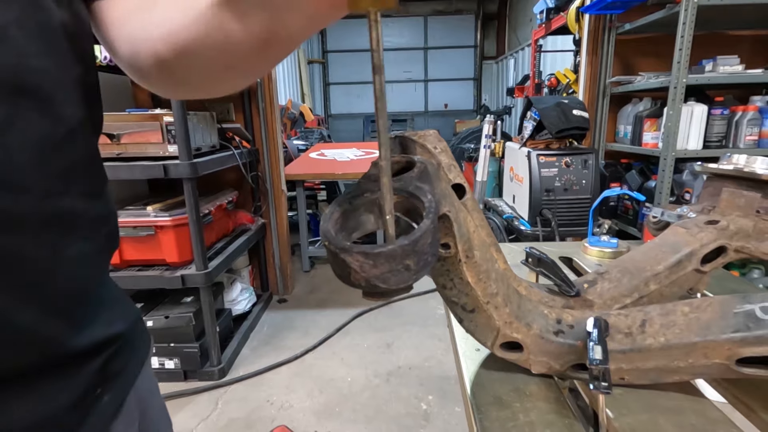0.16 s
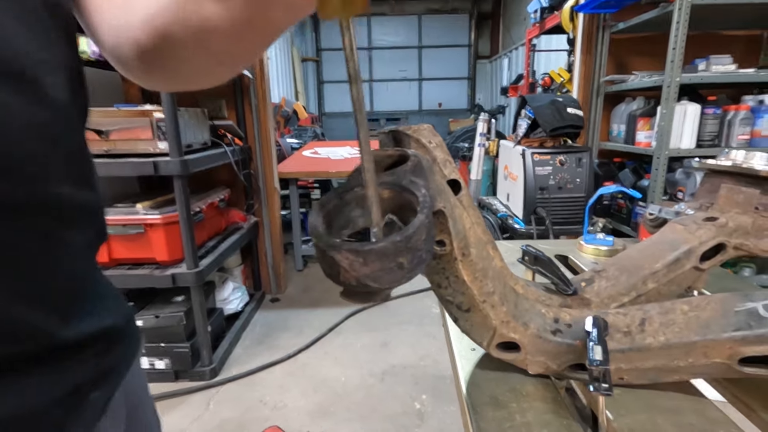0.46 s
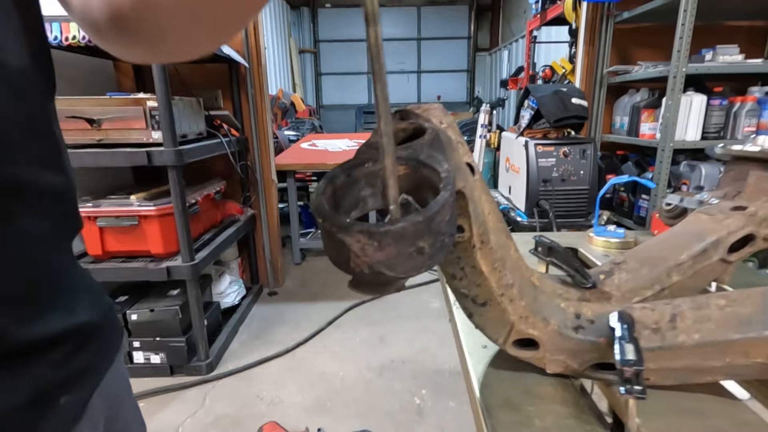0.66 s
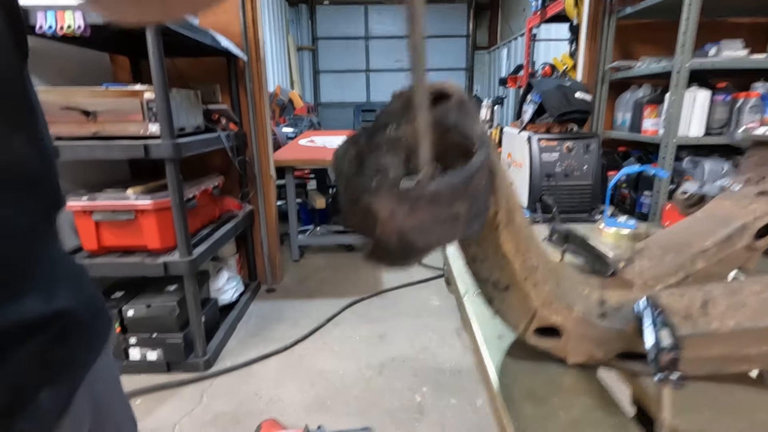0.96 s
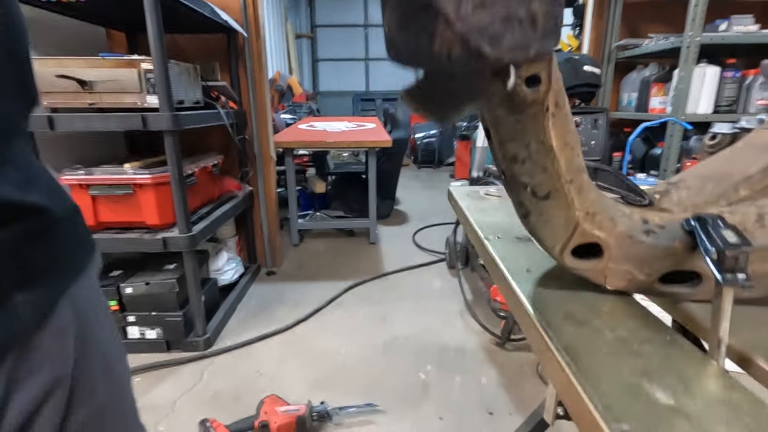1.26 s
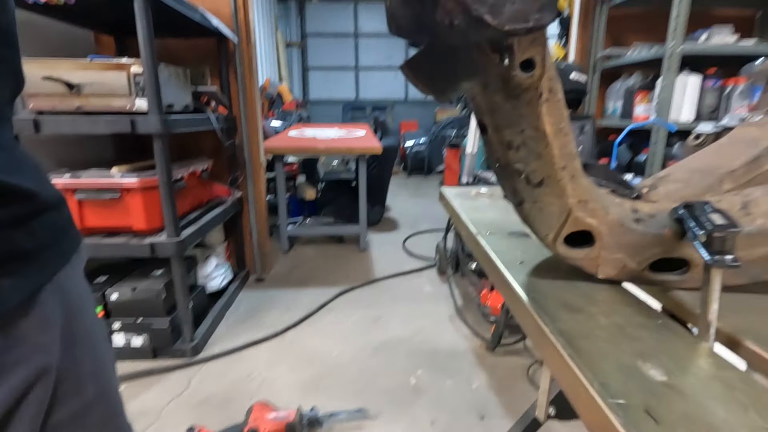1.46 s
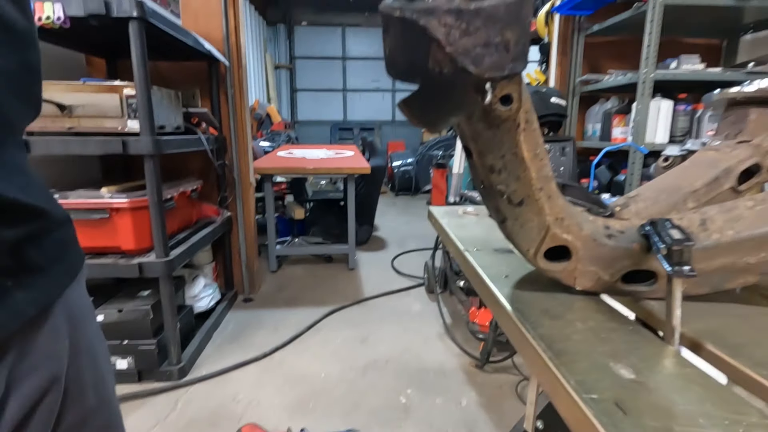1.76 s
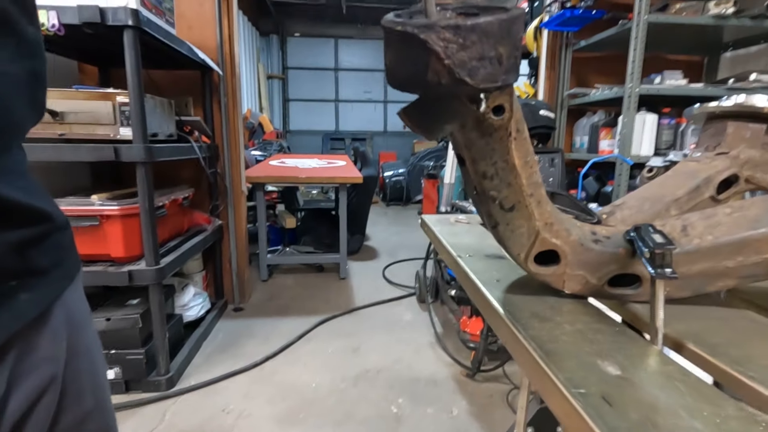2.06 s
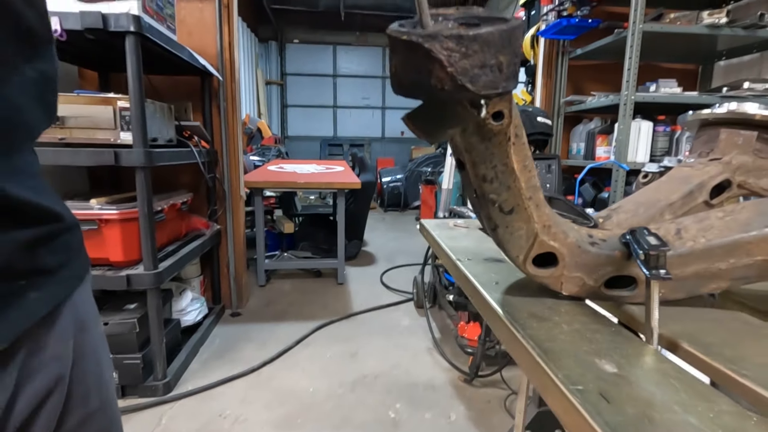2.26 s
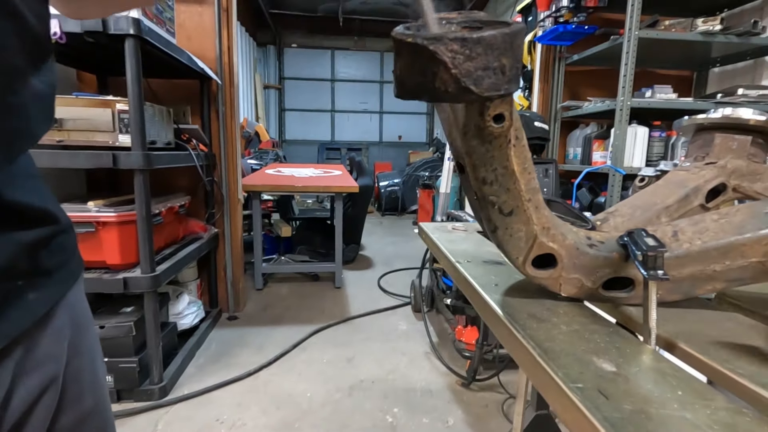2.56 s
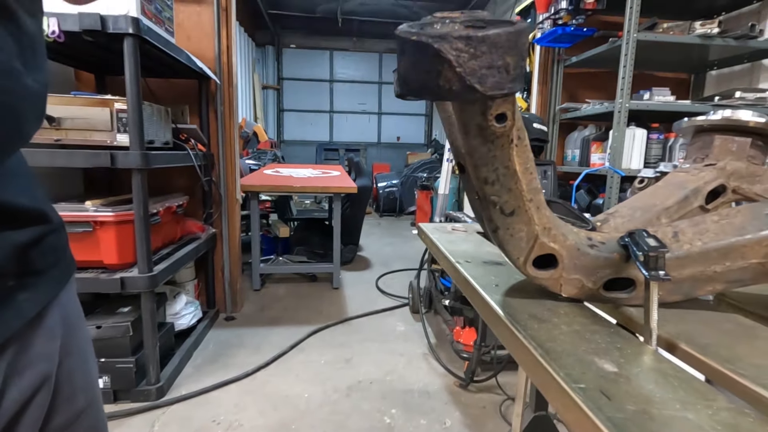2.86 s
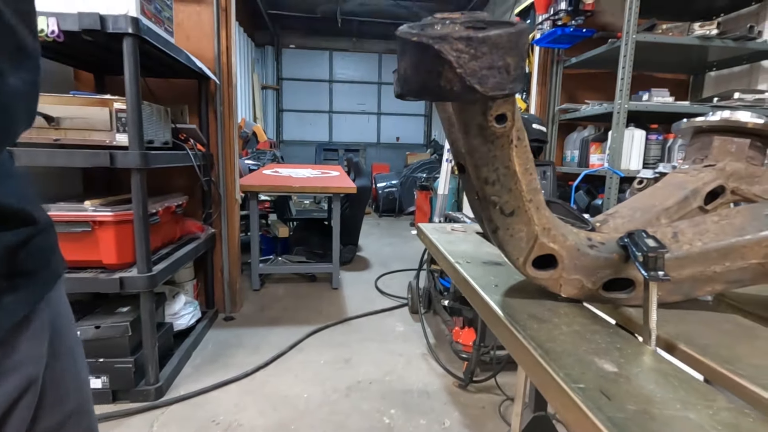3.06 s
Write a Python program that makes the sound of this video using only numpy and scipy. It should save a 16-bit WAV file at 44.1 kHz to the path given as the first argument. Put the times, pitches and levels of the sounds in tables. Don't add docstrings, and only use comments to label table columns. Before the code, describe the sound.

Close up in a reverberant garage, four sharp steel hammer blows, a brief chisel touch and slide, a pause, then a fifth blow frees a metal bushing that bounces, rocks and scrapes on the bench top.

```python
import sys
import numpy as np
from scipy import signal
from scipy.fft import rfft, irfft, next_fast_len
from scipy.io import wavfile
from scipy.ndimage import map_coordinates

SR = 44100
rng = np.random.default_rng(int(sys.argv[2]) if len(sys.argv) > 2 else 0)


def invert_db(x):
    u = np.asarray(x, float) / 20
    return 10 ** u


def transcribe(u):
    v = np.clip(np.atleast_2d(u).T, -1, 1)
    q = np.round(v * 32767).astype(np.int16)
    wavfile.write(sys.argv[1], SR, q)


N = 141120

# pitch_hz [Hz], level_db [dB]
CRACK_COLOUR = [(150, -30.5), (800, -0.5), (2500, 1.5), (8000, -6.5), (16000, -19.5)]
# pitch_hz [Hz], level_db [dB]
WASH_COLOUR = [(60, -17), (300, -11.5), (1000, 6), (2500, 7.5), (6000, 0.5), (16000, -22.5)]
# pitch_hz [Hz], t60_s [s]
WASH_DECAY = [(100, 0.11), (700, 0.26), (2000, 0.2), (5000, 0.15), (13000, 0.097)]
# pitch_hz [Hz], level_db [dB], t60_s [s]
SHANK_MODES = [(9100, 0, .1), (12400, -2, .08), (14830, -11, .07)]


def unit(x):
    return x / np.sqrt(np.mean(x ** 2) + 1e-20)


def along(points, hz):
    point_hz, value = np.transpose(points)
    return np.interp(np.log(hz + 1), np.log(point_hz + 1), value)


def curve(rows):
    s, value = np.transpose(rows)
    return np.interp(np.arange(N) / SR, s, value)


def wobble(rate_hz):
    values = rng.standard_normal(int(N * rate_hz / SR) + 4)
    return map_coordinates(values, [np.arange(N) * rate_hz / SR])


def coloured(x, colour):
    size = next_fast_len(len(x) + 8192)
    gain = invert_db(along(colour, np.fft.rfftfreq(size, 1 / SR)))
    return irfft(rfft(x, size) * gain, size)[:len(x)]


def dying(colour, decay, bright_db=0):
    hz, t, z = signal.stft(rng.standard_normal(SR // 2), SR, nperseg=128)
    tilt_db = bright_db * np.log2((hz + 50) / 2000) / 2
    gain = unit(invert_db(along(colour, hz) + tilt_db))
    fall = invert_db(-60 * t / along(decay, hz)[:, None])
    return signal.istft(z * gain[:, None] * fall, SR, nperseg=128)[1][:SR // 2]


def burst(colour, t60_s, bright_db=0):
    fall = invert_db(-60 * np.arange(SR // 2) / SR / t60_s)
    return dying(colour, [(1, 9)], bright_db) * fall


def ring(modes, scatter_db=2):
    split_hz, blur_rad = 5, .35
    hz, db, t60_s = np.transpose(modes)[:, :, None]
    t = np.arange(SR // 2) / SR
    balance, detune, split = rng.standard_normal((3, len(modes), 1))
    beat = np.cos(2 * np.pi * split_hz * split * t)
    steps = rng.standard_normal((len(modes), 175)).repeat(126, 1)
    wander = np.cumsum(steps, 1) * blur_rad / 126
    fall = invert_db(db + scatter_db * balance - 60 * t / t60_s)
    tone = np.sin(2 * np.pi * hz * (1 + .001 * detune) * t + wander)
    return (fall * beat * tone).sum(0)


def softly(rise_s):
    return 1 - np.exp(-np.arange(SR // 2) / SR / rise_s)


def add(track, s, sound):
    part = track[round(s * SR):][:len(sound)]
    part += sound[:len(part)]


def hammer():
    blow_s = [.4766, .8187, 1.1541, 1.428, 2.3549]
    # chisel_ring_db [dB], socket_knock_db [dB], bench_thud_db [dB], crack_db [dB], frame_wash_db [dB]
    blows = [
        (-0.5, -15, -23.5, -8, -26.5),
        (-8.5, -11, -11.5, -12, -28.5),
        (-6.5, -16, -10, -12, -28.5),
        (-14.5, -21.5, -27, -9.5, -27),
        (-8.5, -26, -41.5, -9.5, -33.5),
    ]
    # pitch_hz [Hz], level_db [dB]
    clack_modes = [
        [(830, -10.5), (1710, -3), (2540, 2), (3400, -13.5), (4630, -15), (5930, -16.5), (7000, -12.5),
         (10900, -25)],
        [(926, -4.5), (1770, -1.5), (2160, 3), (2700, -1), (4380, -12.5), (6490, -9.5), (7570, -13.5)],
        [(1370, -16.5), (2230, 2), (2930, -11.5), (4100, -13.5), (4840, -10), (7490, -14.5), (9140, -13.5)],
        [(1670, -7), (3360, -9), (4710, 0.5), (5890, -3.5), (6820, 0), (9500, -5), (11400, -3.5)],
        [(1500, -21), (2500, 2.5), (3750, 1.5), (4790, -11), (6360, -12), (8100, -8.5), (10700, -21)],
    ]
    grip = [0.016, 0.013, 0.014, 0.0077, 0.012]
    bite = [-7, 0.5, 3, -0.5, 8]
    # pitch_hz [Hz], level_db [dB], t60_s [s]
    socket = [(566, 4, 0.01), (882, 2, 0.013), (1443, 1, 0.014)]
    # pitch_hz [Hz], level_db [dB], t60_s [s]
    bench = [(55.4, -21, 0.2), (151, -4, 0.016), (304, -10.5, 0.013)]
    # pitch_hz [Hz], level_db [dB], t60_s [s]
    frame_modes = [(915, -6, .2), (1017, -6, .25), (1385, -6, .28), (1615, -6, .18), (1735, -6, .24),
                   (1870, -6, .18), (2000, -7, .2), (2850, -5, .24), (3370, -9, .13), (3500, -8, .17),
                   (4118, -12, .16), (4590, -3, .1), (5260, -12, .15), (5980, -15, .17)]
    x, clacks = np.zeros((2, N))
    for s, clack, t60_s, bright_db, levels in zip(blow_s, clack_modes, grip, bite, blows):
        ring_db, knock_db, thud_db, crack_db, wash_db = levels
        add(clacks, s, invert_db(ring_db) * ring([(hz, db, t60_s) for hz, db in clack]))
        knock = invert_db(knock_db) * ring(socket)
        thud = invert_db(thud_db) * ring(bench)
        crack = invert_db(crack_db) * burst(CRACK_COLOUR, .013, bright_db)
        shaken = dying(WASH_COLOUR, WASH_DECAY) + invert_db(-8.5) * ring(frame_modes, scatter_db=3.5)
        add(x, s, knock + thud + crack + invert_db(wash_db) * shaken)
    return x, clacks


def chisel():
    # start_s [s], click_db [dB], ring_db [dB], wash_db [dB]
    touches = [
        (1.486, -30, -27.5, -45),
        (1.5, -43, -37, -53),
        (1.508, -30.5, -38.5, -44.5),
        (1.9087, -41.5, -32.5, -47),
    ]
    # pitch_hz [Hz], level_db [dB], t60_s [s]
    touch_modes = [(440, -7, .04), (2370, 0, .045), (3950, -4, .025), (4700, -10, .04), (5950, -9, .025)]
    # start_s [s], click_db [dB], ring_db [dB]
    rebounds = [(2.3549, -39, -23), (2.3632, -12.5, -28), (2.369, -24, -30), (2.374, -19, -37),
                (2.3785, -34, -35.5), (2.3845, -28.5, -46)]
    # pitch_hz [Hz], level_db [dB], t60_s [s]
    loose = [(1238, -8, .095), (1637, -3, .18), (2083, -2, .17), (3386, -10, .12), (4167, -7, .14),
             (4506, -8, .12), (4743, -12, .18), (5329, -11, .13), (8780, -9, .06), (9065, -11, .06)]
    # pitch_hz [Hz], level_db [dB]
    tap = [(600, -23), (1900, 16), (4000, -8.5), (9000, -3.5), (16000, -20)]
    # start_s [s], peak_db [dB]
    rests = [(2.964, -52.5), (2.9872, -45.5), (3.011, -48.5), (3.0776, -51.5), (3.1093, -51)]
    # time_s [s], level_db [dB]
    song_db = [(1.51, -49), (1.555, -49), (1.575, -38.5), (1.592, -56), (1.61, -90)]
    # pitch_hz [Hz], level_db [dB]
    overtones = [(6000, -17), (9400, -20)]
    x, t = np.zeros(N), np.arange(N) / SR
    for s, db, ring_db, wash_db in touches:
        steel = invert_db(ring_db) * ring(touch_modes)
        click = invert_db(db) * burst(CRACK_COLOUR, .018)
        add(x, s, steel + click + invert_db(wash_db) * dying(WASH_COLOUR, WASH_DECAY))
    for s, db, ring_db in rebounds:
        add(x, s, invert_db(ring_db) * ring(loose) + invert_db(db) * burst(tap, .011))
    for s, db in rests:
        chime = invert_db(-4) * ring(SHANK_MODES, scatter_db=4) + invert_db(2) * burst(CRACK_COLOUR, .12)
        add(x, s, invert_db(db - 9) * softly(.003) * chime)
    song = np.sin(2 * np.pi * 2372 * t)
    for hz, db in overtones:
        level = invert_db(db + 6.5 * wobble(90) - (curve(song_db) + 48) / 2)
        song += level * np.sin(2 * np.pi * hz * t + 1.5 * wobble(510))
    sliding = (t > song_db[0][0]) & (t < song_db[-1][0])
    return x + sliding * invert_db(curve(song_db)) * song


def bushing():
    # start_s [s], peak_db [dB], ring_db [dB], wash_db [dB], bright_db [dB]
    falls = [
        (2.45, -7, -25, -15, 7),
        (2.465, -4.5, -5, -2, 2),
        (2.613, -5, -11, -5, 5),
        (2.7802, -15.5, -7.5, -1, 5),
    ]
    # start_s [s], peak_db [dB], ring_db [dB], wash_db [dB], bright_db [dB]
    rocks = [(2.48, -20, -9, -3, -4.5), (2.4995, -10, -4.5, -6.5, 2), (2.534, -10, -19, -7, 7),
             (2.546, -24, 4, -2, -5), (2.574, -9, -12.5, -11, -0.5), (2.58, -12.5, -18, -9, -3),
             (2.664, -22.5, 1.5, 0, -6), (2.805, -17.5, -3, -3.5, -6.5), (2.839, -27.5, 2, -1, -1.5)]
    # pitch_hz [Hz], level_db [dB], t60_s [s]
    bushing_modes = [(1567, -4, .25), (1645, -2, .25), (1870, -4, .2), (2070, -4, .18), (3033, -2, .14),
                     (3092, -5, .18), (3478, -5, .2), (3800, -5, .18), (4176, 0, .25), (4765, -5, .22),
                     (5761, -7, .17), (6230, -9, .1), (7120, -12, .12), (1304, -6, .2)]
    # pitch_hz [Hz], level_db [dB]
    clatter = [(150, -43), (500, -1.5), (1600, -2.5), (4500, -4), (7800, -6.5), (9000, -14.5), (16000, -29)]
    # pitch_hz [Hz], t60_s [s]
    clatter_decay = [(300, 0.37), (1500, 0.42), (5000, 0.28), (8000, 0.18), (13000, 0.21)]
    # pitch_hz [Hz], level_db [dB], t60_s [s]
    chisel_strike = [(2550, -24.5, .03), (4560, 3.5, 0.04), (5920, -1, .05), (5760, -16, .03), (6350, -6, .03),
                     (8140, -14, .015), (10900, -16, .03)]
    # pitch_hz [Hz], level_db [dB], t60_s [s]
    hop = [(4180, -27, .17), (4172, -44, .55)]
    x = np.zeros(N)
    for rows, rise_s in ((falls, .0006), (rocks, .0015)):
        for s, db, ring_db, wash_db, bright_db in rows:
            snap = burst(CRACK_COLOUR, .022, bright_db) * softly(rise_s / 3)
            metal = invert_db(ring_db) * (ring(bushing_modes) + invert_db(-13) * ring(SHANK_MODES))
            shaken = invert_db(wash_db) * dying(clatter, clatter_decay, bright_db)
            add(x, s, invert_db(db - 13) * (snap + softly(rise_s) * (metal + shaken)))
    add(x, falls[0][0], invert_db(-24) * ring(chisel_strike))
    add(x, 2.795, softly(.012) * ring(hop, scatter_db=0))
    return x


def squeak():
    # time_s [s], pitch_hz [Hz], level_db [dB]
    scrape = [
        (2.822, 8900, -70),
        (2.836, 9300, -45),
        (2.855, 10100, -49),
        (2.885, 10900, -65),
    ]
    s, hz, db = np.transpose(scrape)
    t = np.arange(N) / SR
    scraping = (t > s[0]) * (t < s[-1])
    phase = 2 * np.pi * np.cumsum(np.interp(t, s, hz)) / SR
    return scraping * invert_db(np.interp(t, s, db)) * np.sin(phase + 1.5 * wobble(900))


def frame():
    # start_s [s], peak_db [dB], bright_db [dB]
    knocks = [(0.396, -43, 1), (0.522, -30.5, 18), (0.642, -32, -16.5), (0.66, -38, 6), (0.715, -50, 7),
              (0.751, -36.5, -4), (0.906, -34, 6.5), (1.021, -37.5, -6), (1.278, -39, 0), (1.597, -42, -3),
              (1.727, -40.5, -5.5), (1.865, -42.5, 0), (2.005, -38, -2), (2.11, -42, -6),
              (2.254, -41, -7.5)]
    # pitch_hz [Hz], level_db [dB]
    knock_colour = [(120, -45), (300, -20), (900, -3.5), (1600, 6), (2500, 0.5), (4500, -10.5),
                    (16000, -37)]
    # start_s [s], level_db [dB]
    drones = [(1.926, -52), (3.02, -46.5)]
    # pitch_hz [Hz], level_db [dB]
    plate = [(500, -16.5), (860, 1.5), (1300, -10.5), (2000, -11.5), (5000, -35)]
    # pitch_hz [Hz], level_db [dB], t60_s [s]
    board = [(850, -7.5, .3), (860, -1.5, 0.4), (960, -1, 0.26)]
    # start_s [s], level_db [dB]
    tinks = [(.904, -54), (1.277, -50)]
    # pitch_hz [Hz], level_db [dB], t60_s [s]
    screw = [(2800, 0, .07), (4100, 0, .05)]
    x, rise_s = np.zeros(N), .00074
    for s, db, bright_db in knocks:
        add(x, s, invert_db(db - 13.5) * softly(rise_s) * burst(knock_colour, .22, bright_db))
    for s, db in drones:
        add(x, s, invert_db(db) * softly(.026) * (burst(plate, .41) + invert_db(1.5) * ring(board)))
    for s, db in tinks:
        add(x, s, invert_db(db) * softly(rise_s) * ring(screw))
    return x


def walls(x):
    # pitch_hz [Hz], t60_s [s]
    room = [(200, 0.8), (2000, 0.7), (8000, 0.6), (15000, 0.14)]
    tail = dying([(100, 2.5), (16000, 3)], room)
    late = np.pad(x, (round(.012 * SR), 0))
    return signal.fftconvolve(late, tail / np.linalg.norm(tail))[:N]


def garage():
    # pitch_hz [Hz], level_db [dB]
    air_colour = [(25, 5), (100, -7.5), (300, -8), (1000, -10.5), (2000, -14), (5000, -28.5), (16000, -40)]
    # pitch_hz [Hz], level_db [dB]
    hum_tones = [(75.4, -79), (118.4, -81.5), (242.2, -83.5), (522.2, -82.5)]
    # time_s [s], level_db [dB]
    sway_db = [(0, -49.5), (.36, -55.5), (.45, -38.5), (.9, -41.5), (1.25, -34.5), (1.7, -42), (2, -35.5),
               (2.3, -39.5), (2.7, -43), (3, -41.5), (3.2, -50)]
    # pitch_hz [Hz], level_db [dB]
    rumble = [(2, -38), (8, 18), (30, -7.5), (45, -24.5), (90, -28.5)]
    t = np.arange(N) / SR
    air = invert_db(-64 + .51 * wobble(2.7)) * unit(coloured(rng.standard_normal(N), air_colour))
    hum = np.zeros(N)
    for hz, db in hum_tones:
        hum += invert_db(db + 7.5 + 1.5 * wobble(11)) * np.sin(2 * np.pi * hz * t + .94 * wobble(6.9))
    shake = unit(coloured(rng.standard_normal(N), rumble + [(200, -120)]))
    swing = np.sin(2 * np.pi * 9.8 * t + wobble(5.8))
    return air + hum + invert_db(curve(sway_db)) * invert_db(-3.5) * (swing + shake)


def scene():
    # pitch_hz [Hz], level_db [dB]
    apart = [(30, -55.5), (300, -43), (1400, -45), (5000, -39.5), (9000, -19.5), (15000, -13)]
    blows, clacks = hammer()
    near = blows + chisel() + frame() + bushing() + squeak()
    echo = walls(near + invert_db(-9) * clacks)
    mid = near + clacks + invert_db(-26.5) * echo + garage()
    scatter = np.pad(burst([(100, 0)], .04), (40, 0))
    side = coloured(signal.fftconvolve(mid, scatter / np.linalg.norm(scatter))[:N], apart)
    return np.array([mid + side, mid - side])


def low_pass(x):
    return signal.sosfilt(signal.butter(12, 16990, fs=SR, output="sos"), x)


def record(dry):
    # pitch_hz [Hz], level_db [dB]
    mic = [(15500, 0), (16000, -16), (16900, -26), (17000, -120)]
    ceiling, knee = .41, 5
    clipped = dry / (1 + np.abs(dry / ceiling) ** knee) ** (1 / knee)
    mix = np.array([coloured(port, mic) for port in clipped])
    return low_pass(mix)


dry = scene()
out = record(dry)
transcribe(out)
```